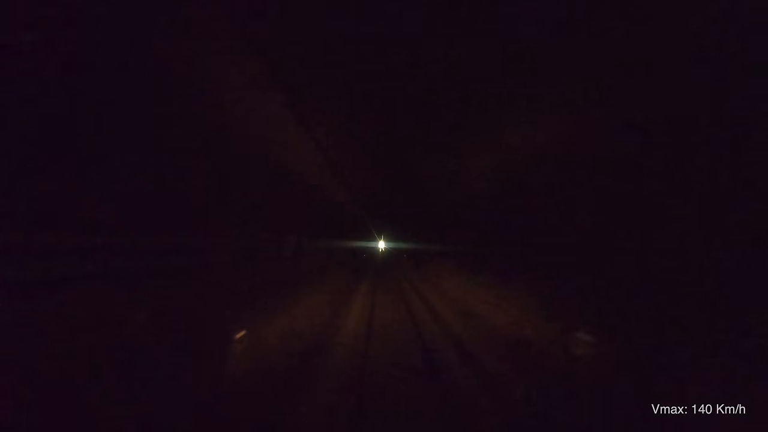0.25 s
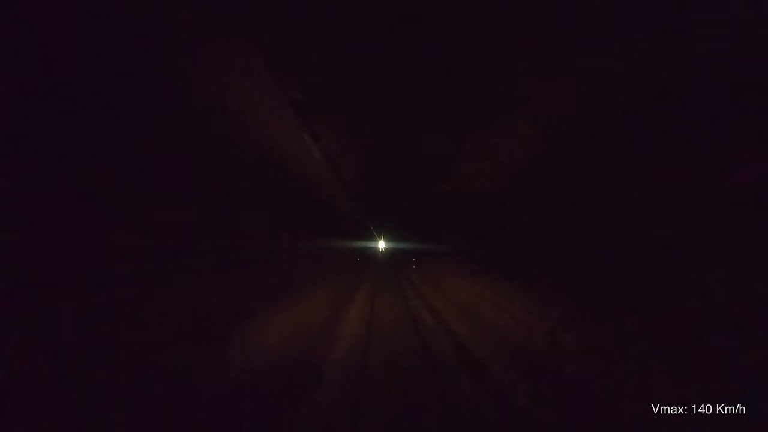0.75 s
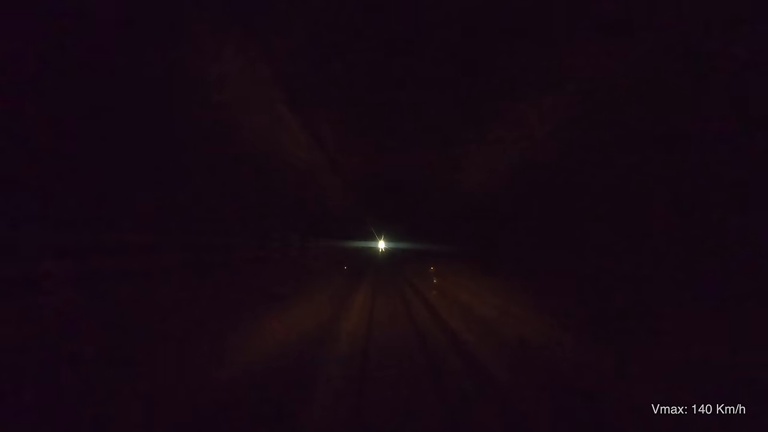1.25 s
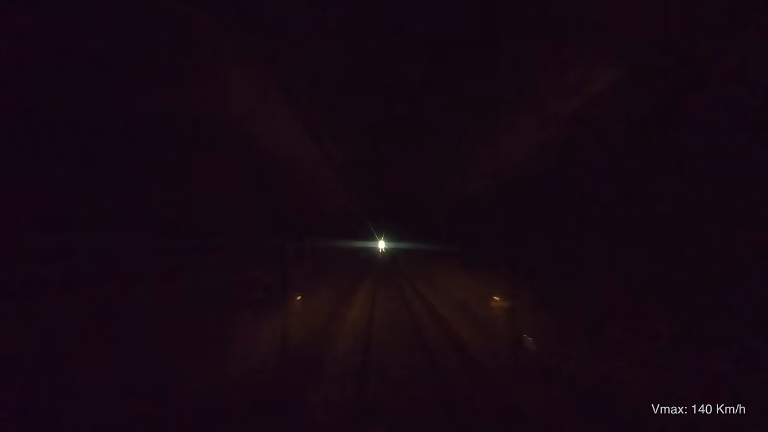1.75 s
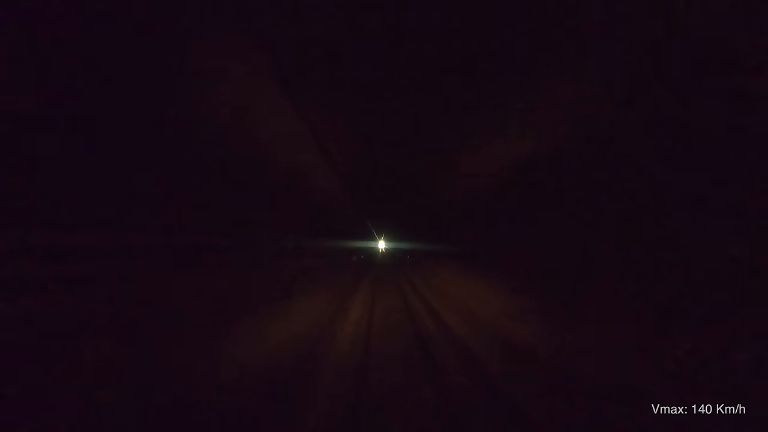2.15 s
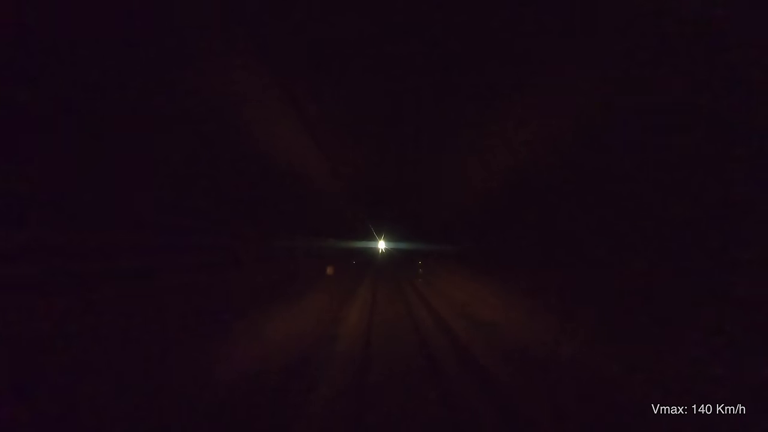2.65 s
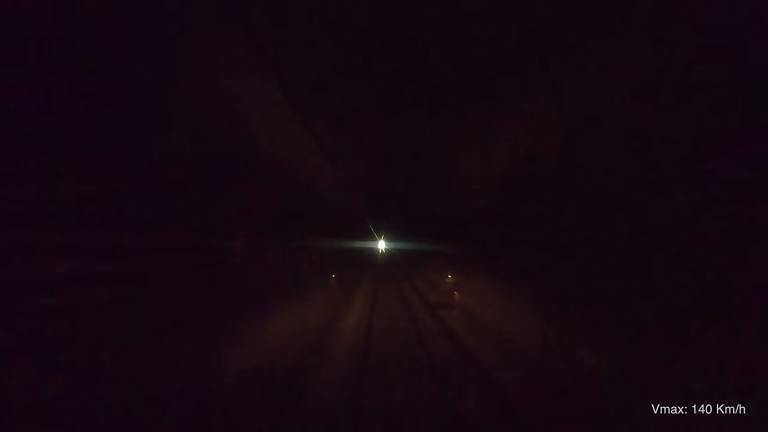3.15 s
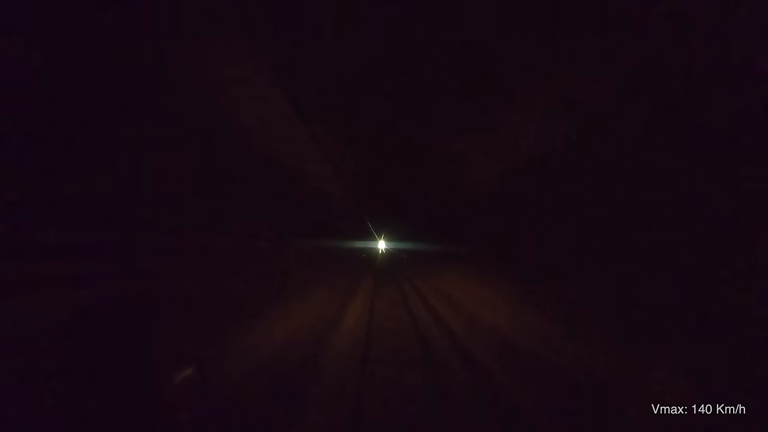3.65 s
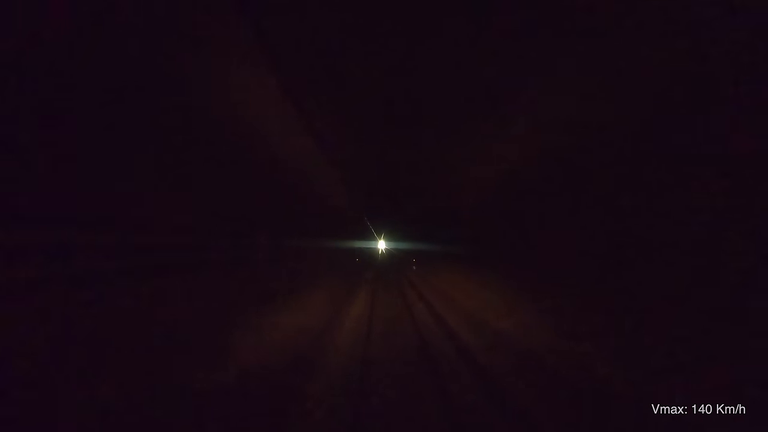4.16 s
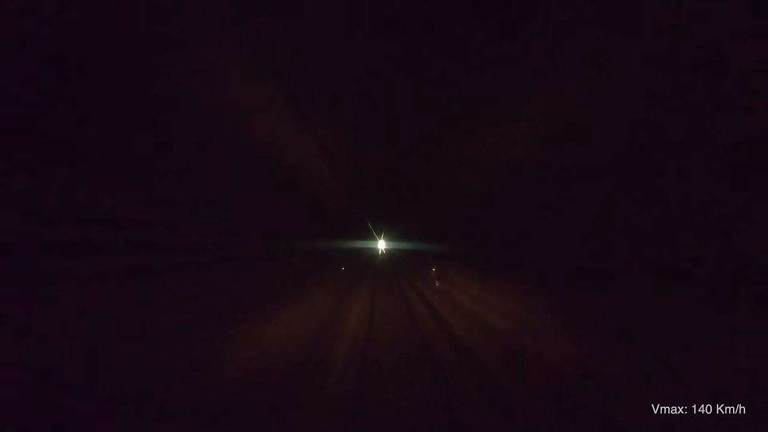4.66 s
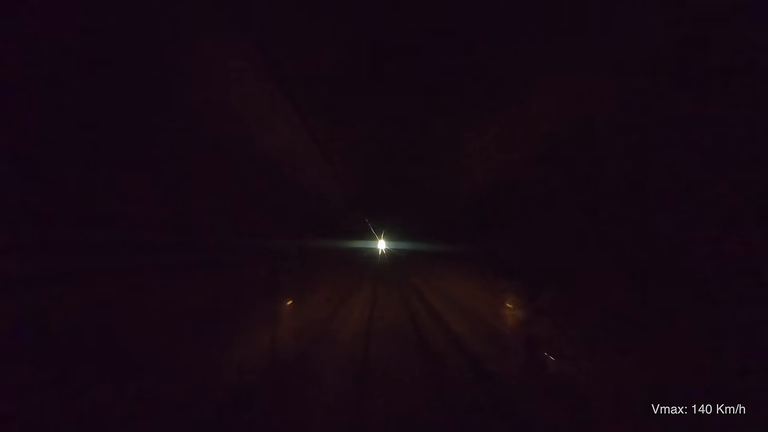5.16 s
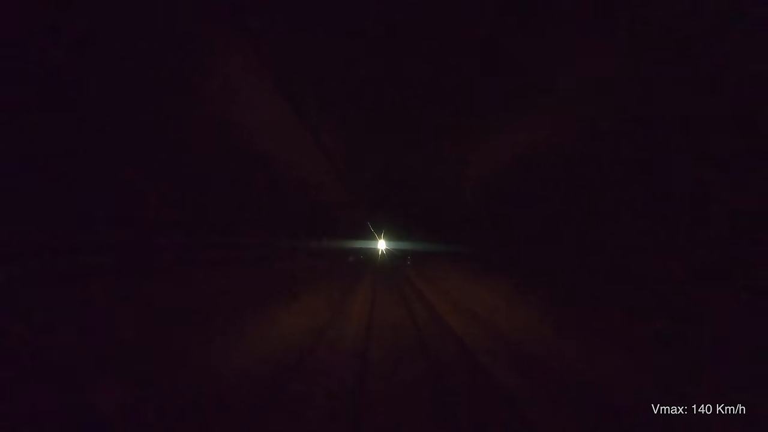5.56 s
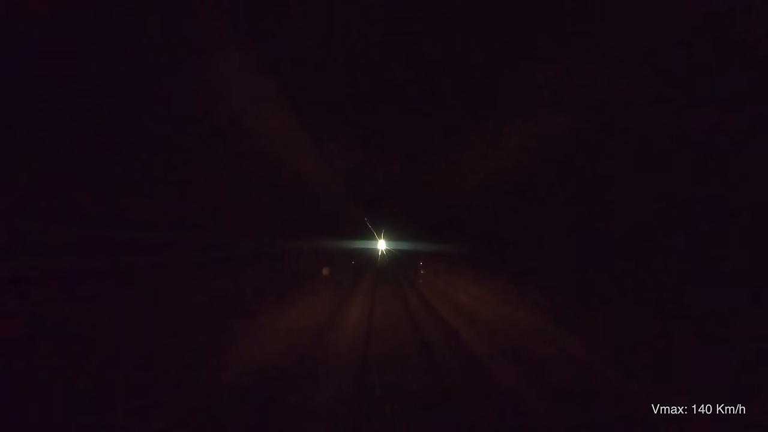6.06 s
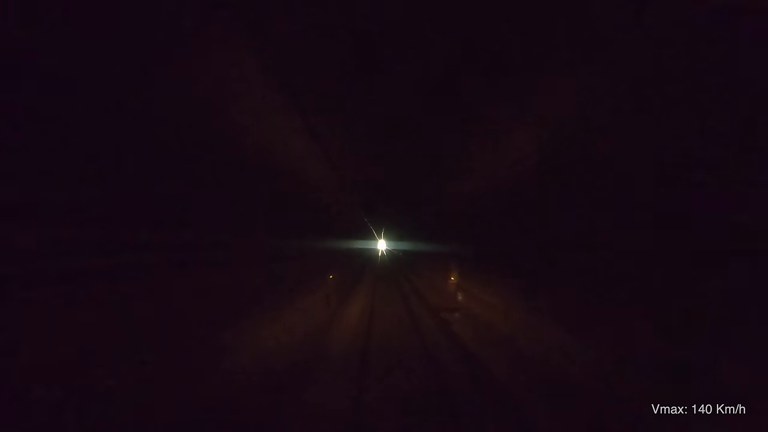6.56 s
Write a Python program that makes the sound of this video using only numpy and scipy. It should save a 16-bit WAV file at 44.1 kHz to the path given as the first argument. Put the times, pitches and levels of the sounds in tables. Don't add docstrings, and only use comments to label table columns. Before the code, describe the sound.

Inside an electric train cab rolling through a tunnel, deep rumble and booming jolts dominate over muffled wheel roar, faint hum and low air thumps.

```python
import sys
import numpy as np
from scipy import signal
from scipy.io import wavfile
from scipy.ndimage import uniform_filter1d, minimum_filter1d

SR = 44100
rng = np.random.default_rng(int(sys.argv[2]) if len(sys.argv) > 2 else 0)


def unload_audio(sound):
    columns = np.transpose(np.atleast_2d(sound))
    steps = np.round(np.clip(columns, -1, 1) * 32767)
    wavfile.write(sys.argv[1], SR, steps.astype(np.int16))


def convert_level_to_amplitude(level_db):
    exponent = np.asarray(level_db, float) / 20
    return 10 ** exponent


N = 299876
T = np.arange(N) / SR


def evened(x):
    return x / np.sqrt(np.mean(x ** 2) + 1e-20)


def wander(smooth, *more_smooth, shape=N):
    drift = rng.standard_normal(shape)
    for span in (smooth, *more_smooth):
        drift = uniform_filter1d(drift, size=span)
    return evened(drift)


def read(points, hz):
    f, value = np.transpose(points)
    return np.interp(np.log(hz + 1), np.log(f + 1), value)


def shut(points, hz):
    outside = (hz < points[0][0]) | (hz > points[-1][0])
    return np.where(outside, -200, read(points, hz))


def ringing(modes, hz):
    return sum(db / (1 + (2 * (hz - f) / width) ** 2) for f, width, db in modes)


def columns(rows):
    s, *cols = np.transpose(rows)
    return [np.interp(T, s, c) for c in cols]


def swell(s, half_s):
    return np.exp(-((T - s) / half_s) ** 2)


def turning(hz):
    return np.exp(2j * np.pi * np.cumsum(hz) / SR)


def ports(colour_db, size, patchy_db):
    # frequency in Hz, likeness from 0 to 1.
    likeness = [(30, 0.92), (110, 1), (210, 1), (380, 0.94), (710, 0.87), (1310, 0.72), (2420, 0.49),
                (3800, 0.31), (5000, 0.17), (6500, 0.11), (9000, .08)]
    # frequency in Hz, left minus right in dB.
    tilt_db = [(60, -0.3), (160, 2), (250, -0.1), (410, 2), (660, 3), (1720, 2.5), (2770, 3.5), (4300, 3),
               (5500, 0), (8000, 0.5), (10000, -4.5)]
    # frequency in Hz, lead of the left in radians.
    lead_rad = [(0, 0), (950, -0.072), (2500, -0.28), (3100, -1.1), (3880, -0.36), (4650, -1.3)]
    hop = size // 4
    hz = np.fft.rfftfreq(size, 1 / SR)[:, None]
    at = np.minimum(np.arange(N // hop + 5) * hop, N - 1)
    a, b, c, d, patches = rng.standard_normal((len(at), len(hz), 5)).T
    patches = uniform_filter1d(patches, size=9, axis=0)
    patches = evened(uniform_filter1d(patches, size=9, axis=1))
    same = np.clip(read(likeness, hz), 0, 1)
    left = a + 1j * b
    right = same * left + np.sqrt(1 - same ** 2) * (c + 1j * d)
    skew = convert_level_to_amplitude(read(tilt_db, hz) / 2) * np.exp(0.5j * read(lead_rad, hz))
    level = convert_level_to_amplitude(colour_db(hz, at) + patchy_db * patches)
    z = np.array([left * skew, right / skew]) * level
    return evened(signal.istft(z, nperseg=size, noverlap=size - hop)[1][:, :N])


def rolling():
    # frequency in Hz, density in dB per Hz.
    rumble = [(12, -42.5), (20, -22), (30, -15), (41, -10), (46, -12), (57, -5.5), (90, -3.5), (108, -3.5),
              (118, -12), (150, -7), (215, -12), (305, -15.5), (390, -27), (520, -58)]
    # frequency in Hz, density in dB per Hz.
    roar_colour = [(250, -25.5), (400, -6), (500, -1), (680, -6), (1000, -9.5), (1400, -12.5), (2000, -18),
                   (3000, -28), (4300, -35), (5200, -42.5), (6500, -46), (8500, -54.5), (9500, -63.5),
                   (13300, -83)]
    # frequency in Hz, width in Hz, gain in dB.
    floor = [(58, 6, 3), (118, 8, -4), (132, 8, 2), (163, 9, 5), (194, 10, 4), (250, 20, 2), (272, 10, -4),
             (302, 10, 4), (328, 12, 3)]
    # frequency in Hz, width in Hz, gain in dB.
    panels = [(443, 18, 9), (490, 25, 2), (650, 20, 3), (458, 10, -4), (522, 14, 4), (575, 25, 3),
              (670, 20, -3), (800, 16, 4), (872, 25, -3), (905, 30, 4), (945, 30, 2), (1000, 30, 2),
              (1160, 20, 4), (1290, 50, 2), (3600, 500, 4), (4800, 500, 3)]
    # time in seconds, dB over the usual.
    track = [(0, 1), (.2, -.5), (.5, -0.5), (.7, -0.5), (1.0, 1), (1.5, -.5), (1.8, 2.5), (2.05, 0),
             (2.5, .5), (2.9, 0.5), (3.2, -1), (3.57, 0.5), (4.0, -0.5), (4.6, 0.4), (5.0, 0), (5.3, .5),
             (5.75, -1), (6.05, 1)]
    # time in seconds, dB added.
    worn = [(1.021, 1.5), (1.531, 2.5), (2.21, 2), (2.449, 0.5), (2.89, 0), (3.23, 3), (3.57, 3),
            (4.08, 2.5), (4.45, 1.5), (5.1, 1.5), (5.781, 1), (6.1, 2)]
    thrum_share, rumble_share, roar_share = 1.6, 0.48, 0.75
    exit_s, exit_db = 6.25, -2
    track_db = np.where(T > exit_s, exit_db, columns(track)[0])
    track_db = uniform_filter1d(track_db, size=4000)
    rumble_db = rumble_share * track_db + sum(db * swell(s, 0.15) for s, db in worn)

    def low(hz, at):
        upper = np.clip((hz - 112) / 25, 0, 1)
        thrum_swing_db = thrum_share * track_db[at] + 0.25
        swing_db = (1 - upper) * thrum_swing_db + upper * (rumble_db[at] - 3.5)
        return shut(rumble, hz) + ringing(floor, hz) + swing_db

    def high(hz, at):
        return shut(roar_colour, hz) + ringing(panels, hz)

    roar = ports(high, size=2048, patchy_db=-0.38)
    through_floor = ports(low, size=4096, patchy_db=1.27)
    return convert_level_to_amplitude(-20.0) * through_floor + convert_level_to_amplitude(-34.5 + roar_share * track_db) * roar


def boom(width_hz=14):
    # time in seconds, peak in dB, centre frequency in Hz.
    jolts = [(0.0, -17, 71.74), (.11, -23, 69.37), (0.329, -23, 74.41), (0.551, -15, 72.05),
             (.71, -14, 74.91), (1.1, -24.5, 76.48), (1.319, -14, 73.48), (1.429, -20, 71.23),
             (1.65, -13, 67.55), (1.981, -13.5, 74.3), (2.18, -23, 77.03), (2.311, -20.5, 75.82),
             (2.529, -19, 71.85), (2.75, -25.5, 73.53), (2.97, -18.5, 77.17), (3.131, -12.5, 79.66),
             (3.8, -18, 71.23), (3.94, -18.5, 68.84), (4.07, -16.5, 67.78), (4.4, -22, 73.72),
             (4.619, -14.5, 73.73), (4.73, -14.5, 74.65), (5.099, -21, 73.37), (5.28, -16.5, 71.73),
             (5.5, -14.5, 69.2), (5.769, -21, 72.8), (6.05, -11.5, 78.44), (6.18, -14, 82.66),
             (6.491, -17.5, 72.2), (6.63, -16.5, 71.6)]
    jolt_s, rest_db = 0.075, -30
    swings = np.array([convert_level_to_amplitude(db) * swell(s, jolt_s) for s, db, _ in jolts])
    level = swings.max(0) + convert_level_to_amplitude(rest_db)
    s, _, centre_hz = np.transpose(jolts)
    hz = np.interp(T, s, centre_hz)
    shake = rng.standard_normal(N) + 1j * rng.standard_normal(N)
    r = np.exp(-np.pi * width_hz / SR)
    for _ in range(2):
        shake = signal.lfilter([1 - r], [1, -r], shake)
    shake /= abs(shake) ** 0.4 + 1e-9
    body = evened((shake * turning(hz)).real)
    return level * convert_level_to_amplitude(-6.0) * body * convert_level_to_amplitude([[0.4], [-0.4]])


def hum():
    # time in seconds, level in dB.
    load = [(0.0, -11), (0.24, -28.5), (0.51, -20), (0.64, -32), (0.8, -22), (1.12, -20.5), (1.61, -25),
            (2.2, -30), (2.37, -20), (2.61, -32.5), (2.87, -15), (3.2, -25), (3.52, -24.5), (3.77, -28),
            (4.15, -21.5), (5.0, -22), (6.5, -23.5), (6.8, -30)]
    level_db, = columns(load)
    turn = turning(50.0 + 1.8 * wander(8000))
    level_db = level_db - 1.5 + 1.8 * wander(3000, 2000)
    wave = turn.real + convert_level_to_amplitude(-15.5) * (turn ** 3).real
    return convert_level_to_amplitude(level_db) * np.sqrt(2) * wave * convert_level_to_amplitude([[0.25], [-0.25]])


def puffs():
    # middle in seconds, peak in dB, length in seconds, top in Hz.
    draughts = [(.102, -27, .015, 200), (0.293, -31, .015, 202), (0.596, -20, 0.016, 222),
                (1.011, -20, 0.034, 303), (1.402, -22, 0.028, 250), (1.867, -24, 0.017, 200),
                (2.662, -23, .03, 250), (2.848, -24, .03, 200), (3.172, -19, 0.019, 200),
                (3.255, -23.5, .02, 200), (3.42, -25.5, 0.069, 180), (3.643, -22, 0.032, 300),
                (3.681, -20, 0.014, 298), (3.73, -24, 0.018, 200), (3.796, -15, 0.0088, 400),
                (3.812, -27, 0.012, 250), (3.914, -19.5, 0.022, 300), (4.51, -24, 0.013, 200),
                (4.618, -15.5, 0.014, 250), (4.828, -23.5, .015, 220), (4.994, -21, .02, 220),
                (5.149, -30, .03, 200), (6.462, -18, .025, 304)]
    out = np.zeros(N)
    air = rng.standard_normal((len(draughts), 8000))
    t = (np.arange(4000) - 2000) / SR
    for (s, peak_db, length, top_hz), gust in zip(draughts, air):
        band = signal.butter(4, [40, 0.7 * top_hz], "bandpass", fs=SR, output="sos")
        lump = signal.sosfilt(band, gust)[4000:]
        lump = lump * np.exp(-(t / (length / 2)) ** 2)
        start = round(s * SR) - 2000
        out[start:start + 4000] += convert_level_to_amplitude(peak_db) * lump / abs(lump).max()
    return out * np.array([[0.4], [-0.6]])


def gear():
    # time in seconds, first and second tone in dB.
    mesh = [(0, -38.5, -49.5), (.55, -43, -46.5), (1.0, -51.5, -48), (1.6, -39, -48), (3.0, -39.5, -46),
            (3.4, -50.5, -50.5), (4.6, -47, -56), (5.5, -53.5, -47), (6.8, -56.5, -51)]
    # time in seconds, frequency in Hz.
    mesh_hz = [(0, 477.8), (6.8, 466)]
    first_db, second_db = columns(mesh)
    turn = turning(columns(mesh_hz)[0] + 2.2 * wander(6000))
    side = np.array([[1], [-1]])
    first = convert_level_to_amplitude(first_db) * turn * np.exp(0.3j * side) * convert_level_to_amplitude(1.1 * side)
    second = convert_level_to_amplitude(second_db) * turn ** 2 * np.exp(0.6j * side) * convert_level_to_amplitude(1.2 * side)
    flutter_db = 3.5 * wander(1500, 1000, shape=(2, N))
    return np.sqrt(2) * (first * convert_level_to_amplitude(flutter_db[0]) + second * convert_level_to_amplitude(flutter_db[1])).real


def rustle():
    # frequency in Hz, density in dB.
    rub_colour = [(4000, -7.5), (5000, -0.5), (5800, -2), (6500, -0.5), (7500, -6.5), (8500, -9),
                  (9500, -14), (11500, -22.5), (13300, -26.5), (14000, -39.5)]
    # middle in seconds, half length in seconds, level in dB.
    fits = [(.1, .05, -78), (0.307, 0.077, -80), (.5, 0.065, -75), (0.699, 0.046, -79), (0.878, .07, -85),
            (1.1, 0.061, -84), (1.598, 0.077, -79), (1.808, 0.1, -87), (2.0, 0.043, -76.5),
            (2.453, .1, -73), (2.714, .06, -74.5), (2.9, .05, -71), (3.212, 0.08, -74.5),
            (3.38, 0.083, -77), (3.73, .09, -76.5), (4.0, .07, -76), (4.45, .11, -73), (4.78, .12, -72.5),
            (5.024, 0.094, -74.5), (5.27, 0.11, -70.5), (5.7, .2, -78), (6.004, 0.066, -70.5),
            (6.18, 0.13, -72), (6.55, 0.16, -72.5)]
    still_db = -89
    level = convert_level_to_amplitude(still_db) + sum(convert_level_to_amplitude(db) * swell(s, half_s) for s, half_s, db in fits)
    grain_db = 0.62 * wander(200)
    hiss = ports(lambda hz, at: shut(rub_colour, hz), size=512, patchy_db=-0.6)
    return level * convert_level_to_amplitude(3.5 + grain_db) * hiss


def scene():
    return rolling() + boom() + hum() + puffs() + gear() + rustle()


def limit(x, knee_db=-11, share=0.42, recover_db_s=90):
    peak = -minimum_filter1d(-abs(x), size=301, axis=1)
    peak_db = 20 * np.log10(peak + 1e-9)
    fall = T * recover_db_s
    held_db = np.maximum.accumulate(peak_db + fall, axis=1) - fall
    over_db = np.maximum(held_db - knee_db, 0)
    return x / convert_level_to_amplitude(share * uniform_filter1d(over_db, size=301, axis=1))


def ticks(x):
    # middle in seconds, peak in dB.
    bursts = [(0.0194, -65.5), (0.201, -62), (0.3415, -70), (0.963, -67.5), (1.112, -70), (1.336, -64.5),
              (1.664, -70), (1.91, -64), (2.0446, -65.5), (2.251, -64.5), (2.285, -66.5), (2.995, -67.5),
              (3.026, -65.5), (3.708, -66), (4.024, -65.5), (2.758, -72), (4.61, -67), (4.745, -66.5),
              (4.7694, -76), (4.7944, -70.5), (4.945, -71), (5.093, -67.5), (5.181, -68), (5.425, -69.5),
              (5.619, -71), (5.764, -63.5), (6.019, -64.5), (6.33, -65.5), (6.441, -69), (6.7106, -71.5)]
    steps_per_s, burst_s = 375, 0.025
    s, peak_db = np.transpose(bursts)
    at = np.arange(0, N / SR - 0.002, 1 / steps_per_s)
    index = (at * SR).astype(int)
    burst = (convert_level_to_amplitude(peak_db) * np.exp(-((at[:, None] - s) / (burst_s / 2)) ** 2)).max(1)
    size = burst * rng.uniform(0.7, 1, len(at)) * x[:, index]
    near = index[:, None] + np.arange(-16, 17)
    shape = np.sinc(near - at[:, None] * SR) * np.hanning(near.shape[1])
    train = np.array([np.bincount(abs(near).ravel(), (c[:, None] * shape).ravel(), N) for c in size])
    bright = signal.butter(2, 9000, "highpass", fs=SR, output="sos")
    return convert_level_to_amplitude(25.5) * signal.sosfilt(bright, train)


def band_limit(x):
    return signal.sosfilt(signal.butter(12, 15700, fs=SR, output="sos"), x)


def record(dry):
    held = limit(convert_level_to_amplitude(1.2) * dry)
    held = held * (1 - 0.68 * np.exp(-(T / 0.01) ** 2))
    return band_limit(held + ticks(held))


dry = scene()
out = record(dry)
unload_audio(out)
```